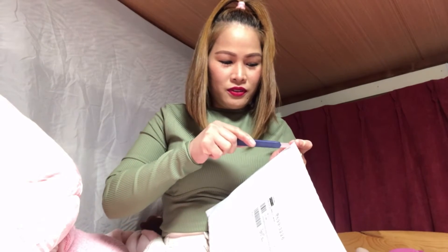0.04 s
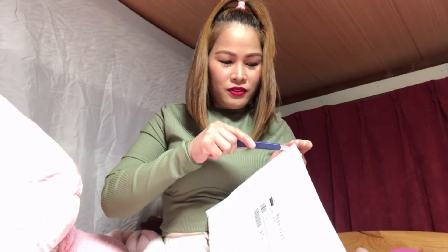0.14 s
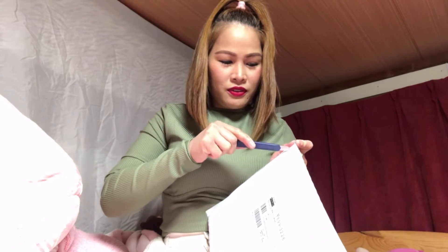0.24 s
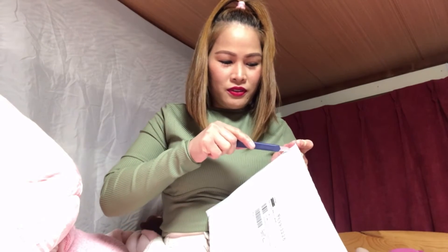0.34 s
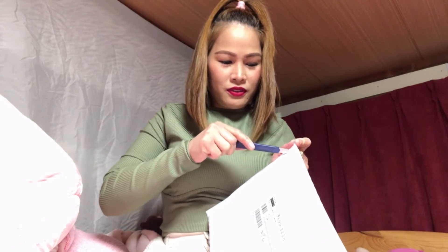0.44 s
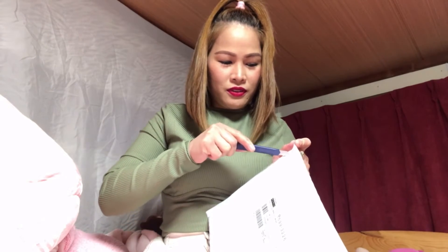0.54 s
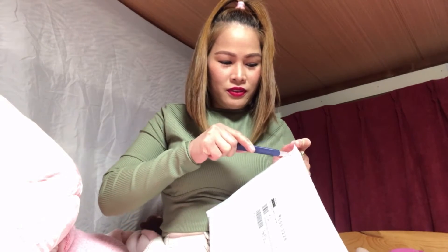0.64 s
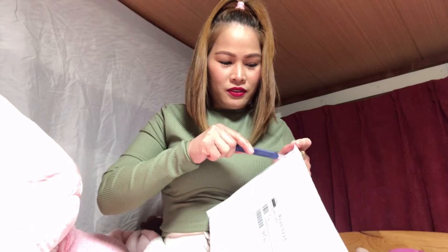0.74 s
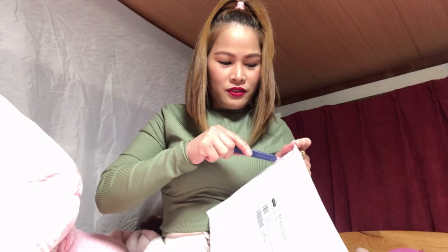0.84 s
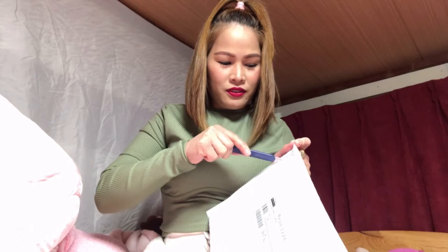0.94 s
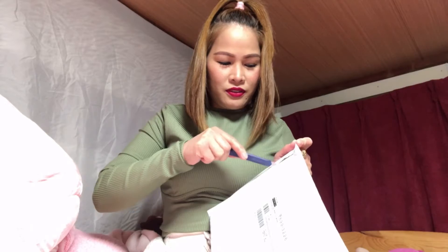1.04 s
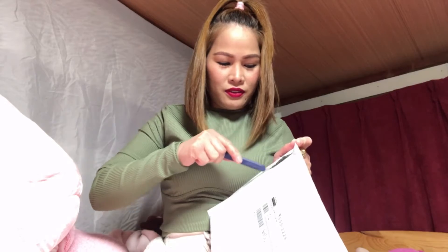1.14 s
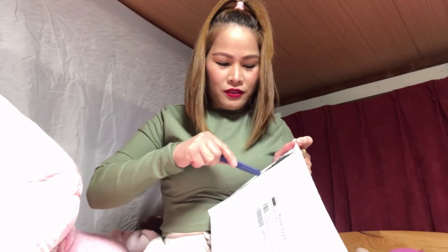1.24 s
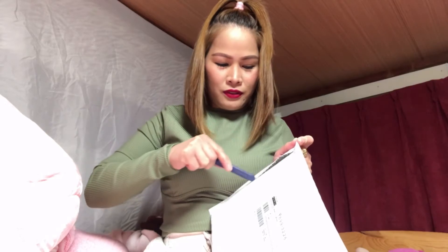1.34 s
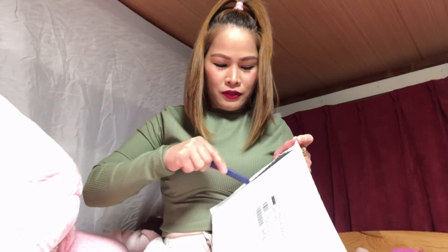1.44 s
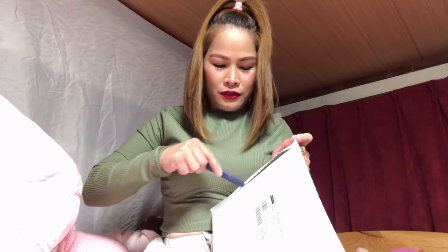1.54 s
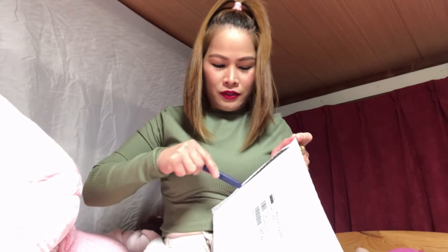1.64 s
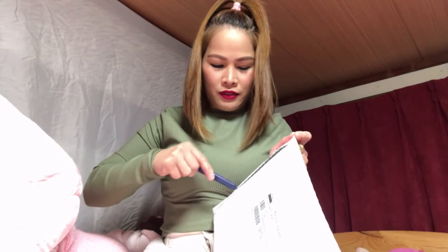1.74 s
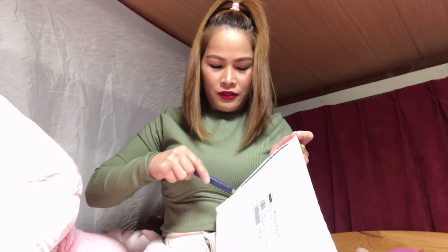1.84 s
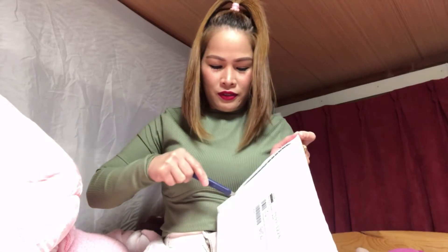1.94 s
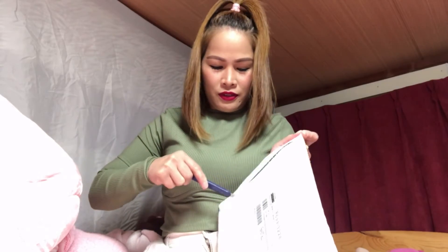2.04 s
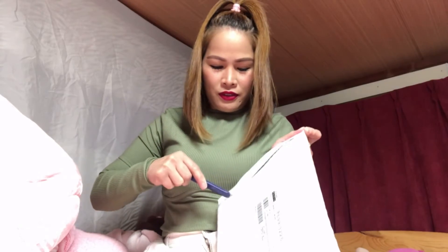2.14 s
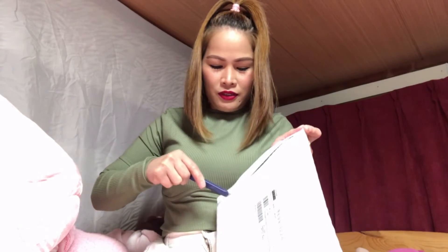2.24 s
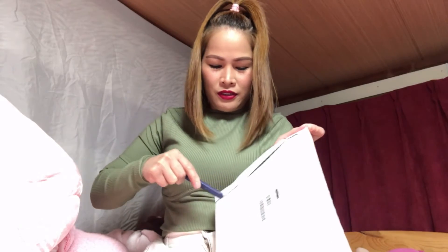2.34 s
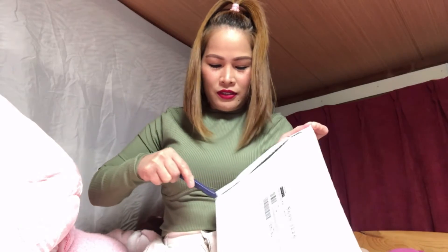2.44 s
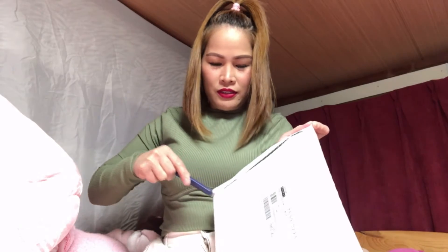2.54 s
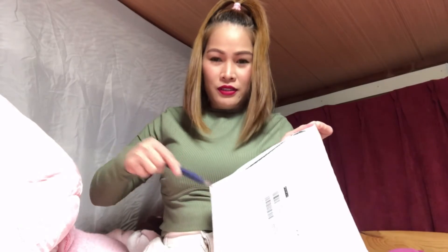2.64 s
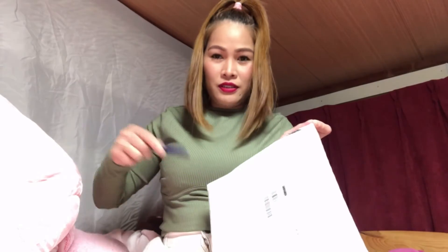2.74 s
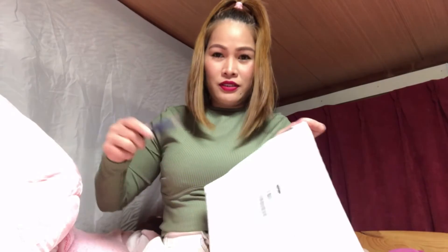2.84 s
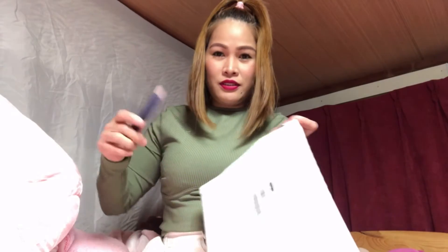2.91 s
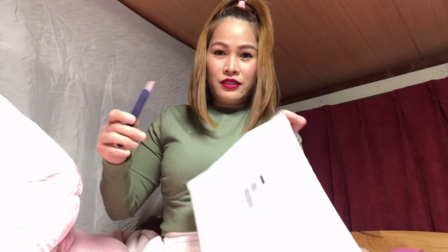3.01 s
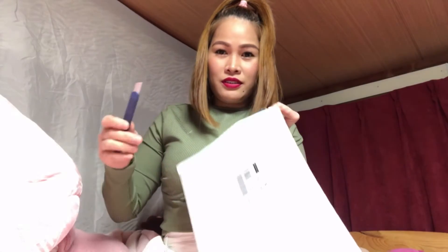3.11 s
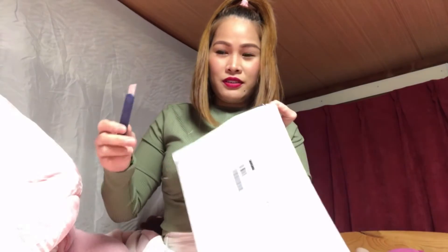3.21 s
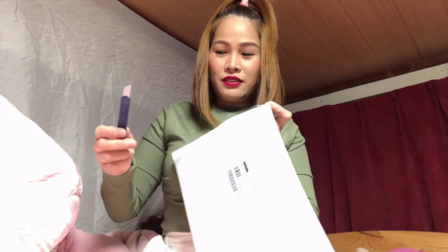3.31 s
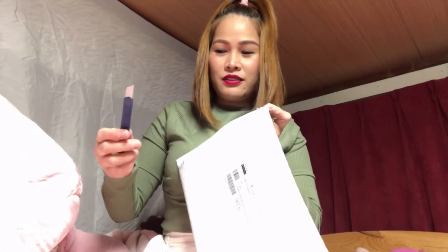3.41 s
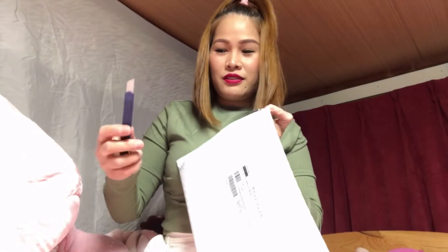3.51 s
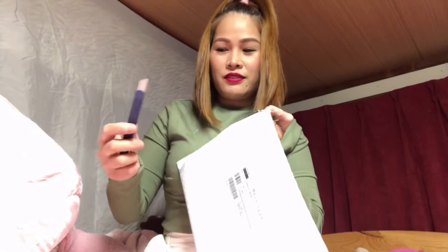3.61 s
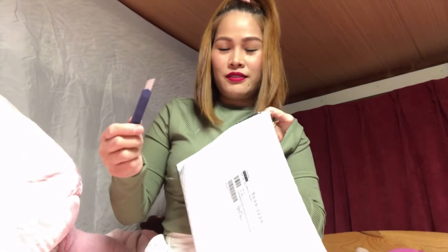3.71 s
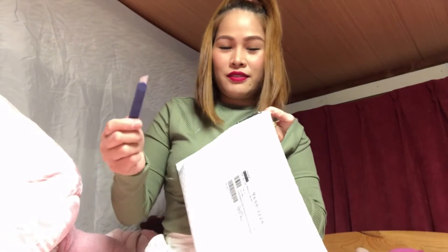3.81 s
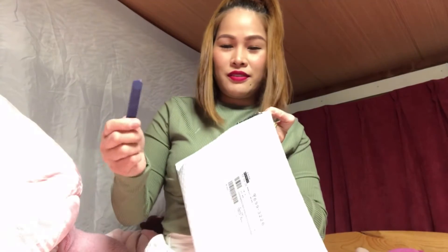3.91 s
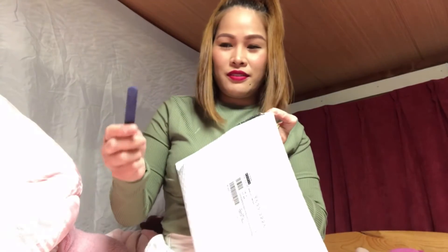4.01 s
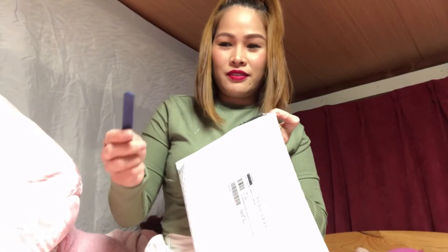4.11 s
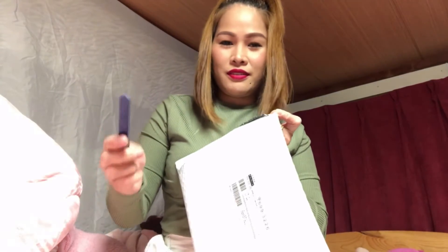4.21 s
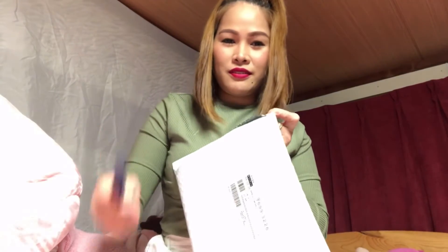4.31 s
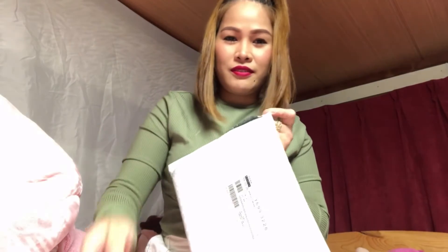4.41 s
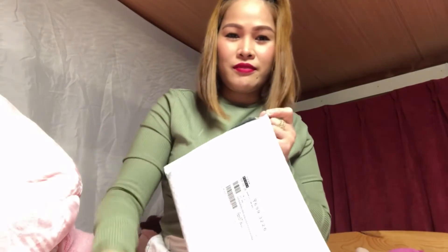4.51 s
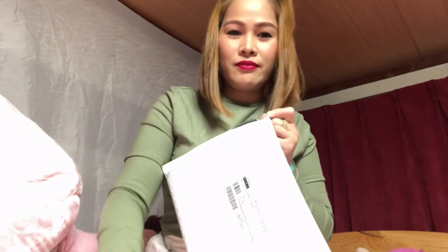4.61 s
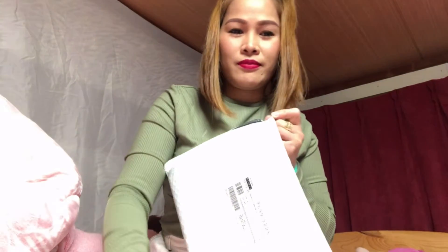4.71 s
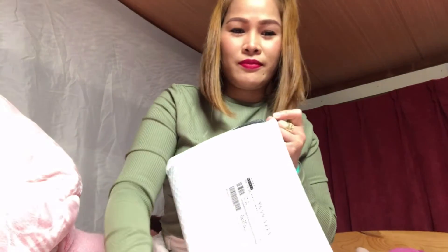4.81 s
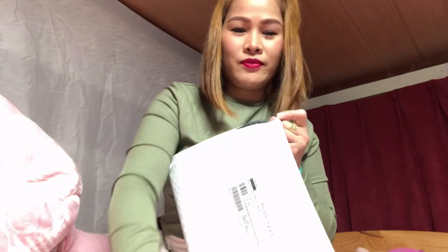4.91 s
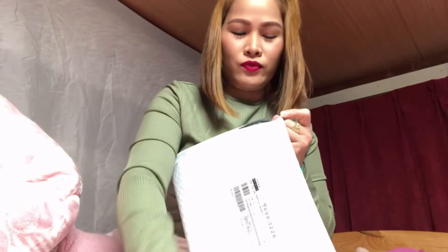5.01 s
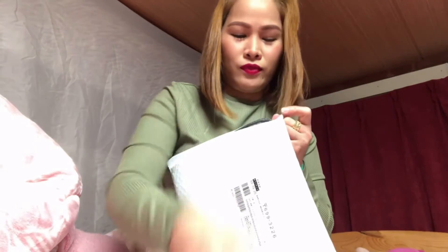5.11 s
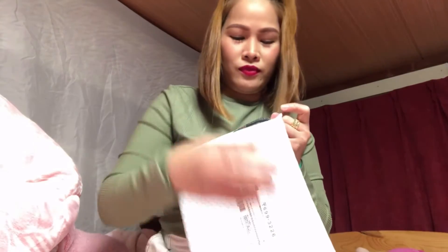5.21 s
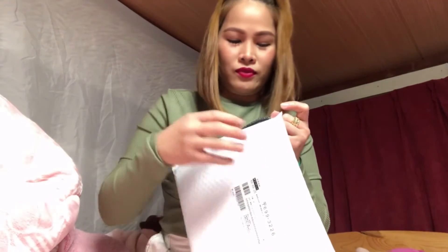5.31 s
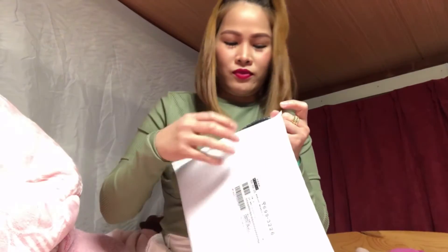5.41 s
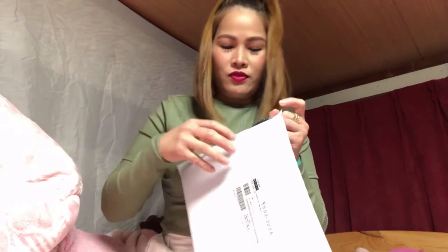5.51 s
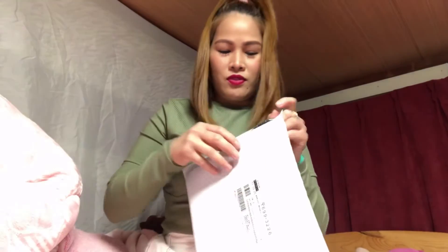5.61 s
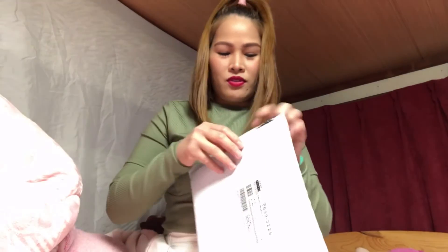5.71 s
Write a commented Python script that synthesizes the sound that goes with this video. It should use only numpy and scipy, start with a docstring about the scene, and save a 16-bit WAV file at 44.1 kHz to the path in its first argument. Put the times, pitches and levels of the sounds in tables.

```python
"""A small quiet room, close up: a stiff paper envelope is slit open with a snap-off knife.
The blade sticks and breaks through the edge in dry snaps, then chatters out at the far corner.
Paper rubs against a sleeve, the blade ratchets back notch by notch into its plastic handle,
and shifting fingers pop the envelope. Faint air and a low hum lie underneath."""
import sys
import numpy as np
from scipy import signal
from scipy.fft import rfft, irfft
from scipy.io import wavfile
from scipy.ndimage import map_coordinates

SR = 44100
rng = np.random.default_rng(int(sys.argv[2]) if len(sys.argv) > 2 else 0)


def unload_audio(sound):
    """Save the sound as a 16-bit wav file, at the path given as the first command line argument."""
    columns = np.transpose(np.atleast_2d(sound))
    # keep every value between -1 and 1, then stretch to whole-number steps
    steps = np.round(np.clip(columns, -1, 1) * 32767)
    wavfile.write(sys.argv[1], SR, steps.astype(np.int16))


N = 253575
TIME = np.arange(N) / SR

# tone of breaking paper: (frequency [Hz], gain [dB])
PAPER_EQ = [(80, -42.5), (160, -13), (250, -10.5), (480, -7), (800, -4), (1200, -2.5), (2100, -2.5),
            (3300, -3), (4200, -8), (6300, -10), (9000, -18), (15500, -21.5)]


def blade_snaps(size=2048):
    """The blade sticks and breaks through; its place along the fold colours each snap."""
    # main breaks: (time [s], level [dB], break length [ms])
    breaks = [(0.0776, -42, 0.35), (0.1418, -32.5, 1.7), (0.157, -45.5, 1), (0.197, -54, 0.55),
              (0.2879, -44, 0.13), (0.297, -37.5, 0.14), (0.3124, -44, 0.71), (0.4183, -30.5, 1.4),
              (0.5456, -43.5, 0.45), (0.5904, -40.5, 0.36), (0.6081, -53, 0.13), (0.739, -43.5, 0.96),
              (0.745, -37.5, 1.5), (0.7596, -28.5, 2.2), (0.7954, -40, 0.53), (0.814, -33.5, 3.2),
              (0.8388, -31, 2.2), (0.966, -39.5, 0.82), (0.9823, -28, 0.81), (0.9954, -34, 0.23),
              (1.018, -36, .2), (1.0568, -30, 0.44), (1.076, -34, 2.8), (1.1348, -31, 2.2),
              (1.151, -37, 0.48), (1.19, -35.5, 0.84), (1.223, -30, 0.76), (1.2452, -35, 0.21),
              (1.2695, -40.5, 0.55), (1.3121, -30.5, 1.6), (1.3256, -27.5, 0.43), (1.372, -34, 4),
              (1.3797, -32, 0.62), (1.4246, -35.5, 0.64), (1.4372, -33.5, 4.3), (1.4929, -35.5, 1.1),
              (1.5115, -35, 4.6), (1.574, -31.5, 1.5), (1.5985, -42.5, .5), (1.6054, -35.5, 1.2),
              (1.6587, -34, 4.8), (1.6883, -35.5, 0.75), (1.714, -29.5, 0.19), (1.785, -38.5, 1.7),
              (1.7919, -36, 0.68), (1.8322, -26.5, 0.77), (1.853, -31.5, 0.31), (1.8873, -34.5, .45),
              (1.9112, -32, 2.4), (1.9394, -35.5, 2.4), (2.0037, -38.5, 1.5), (2.021, -24, 0.27),
              (2.039, -32, 4.3), (2.0734, -32, 0.22), (2.085, -41, 0.44), (2.1015, -23.5, 1.56),
              (2.1387, -25, 0.54), (2.1639, -34.5, 2), (2.233, -25.5, 0.75), (2.2598, -31, 0.77),
              (2.2738, -31, 0.31), (2.2785, -34, 1.5), (2.316, -30.5, 0.57), (2.326, -30.5, 0.41),
              (2.3624, -31, 0.72), (2.373, -29.5, 1.1), (2.4238, -42, 3.4), (2.4542, -48.5, 1.8)]
    # tone of the sheet along the cut: (time [s], low shelf [dB], high shelf [dB])
    cut_tone = [(0.08, -9.5, 8), (0.42, 1.5, 5), (0.6, -3.5, 9), (0.77, -3.5, 2), (1.0, 4.5, 14),
                (1.42, -1.5, -8.5), (1.85, 0.5, -3.5), (2.1, -5.5, -10), (2.3, -1, -5.5)]
    # two notes of the taut panel, sagging as the slit frees it:
    # (time [s], lower note [Hz], its boost [dB], upper note [Hz], its boost [dB])
    panel_notes = [(0.3, 1490, 4, 3850, 9), (0.76, 950, -2, 3400, 3.5), (1.0, 1790, 3, 3660, 3.5),
                   (1.25, 1670, 9, 3160, 2), (1.44, 1690, 9, 3200, -3), (1.6, 1240, 9.5, 2940, 0),
                   (1.85, 1300, 7, 2730, 4.5), (2.12, 1210, 6, 3150, 3.5), (2.26, 1220, 4, 2940, 9)]
    out, hz, followers = np.zeros(N), bins(size), []
    # each break may set off up to two weak ones just behind it
    for (s, db, _), draws in zip(breaks, rng.random((len(breaks), 2, 3))):
        for chance, wait, strength in draws:
            if chance < .42:
                weak_db = -47.5 + 0.61 * (db + 34.5) + 3.5 * (2 * strength - 1)
                followers.append((s + np.interp(wait, [0, 1], [0.0042, 0.033]), weak_db, .6))
    for s, db, length_ms in breaks + followers:
        body_db, edge_db = at_time(cut_tone, s)
        body_db += 1.1 * np.log2(length_ms)  # a longer break moves more of the sheet
        body_db += 2.5 * rng.standard_normal()
        edge_db += 3.5 * rng.standard_normal()
        lower_hz, lower_db, upper_hz, upper_db = at_time(panel_notes, s)
        panel_db = lower_db * bump(hz, lower_hz, q=2.7) + upper_db * bump(hz, upper_hz, q=2.7)
        add(out, s, paper_snap(s, db, body_db, edge_db, length_ms, panel_db))
    return out


def paper_snap(s, db, body_db, edge_db, length_ms, panel_db, size=2048):
    """A fibre bundle breaks, its neighbours follow, and bending waves run on through the sheet."""
    # the top octave beams, brightest while the open edge faces the listener: (time [s], high shelf [dB])
    facing = [(0.85, -9.5), (1.5, 7), (2.4, 8.5), (5.1, -14.5)]
    t, hz = np.arange(size) / SR, bins(size)
    length_s = max(length_ms, .2) / 1000
    fibres = unit(rng.standard_normal(size) ** 3 * np.exp(-t / length_s)) * length_s / 0.00039
    fibres[0] += 1  # the first break
    swell = 1 - np.exp(-t / .0007)
    low_waves = filtered(rng.standard_normal(size), 1 - above(hz, 1300)) * swell * np.exp(-t / .0045)
    high_waves = filtered(rng.standard_normal(size), above(hz, 1300)) * swell * np.exp(-t / .003)
    sheet = gain_of(-14) * unit(low_waves) + gain_of(-10) * unit(high_waves)
    shelves_db = body_db * (1 - above(hz, 1570)) + edge_db * above(hz, 6400)
    beam_db = np.interp(s, *np.transpose(facing)) * above(hz, 8600)
    sound = coloured(unit(fibres) + sheet, read(PAPER_EQ, hz) + shelves_db + beam_db + panel_db)
    # the treble arrives first, 1 kHz half a millisecond later
    dispersion = np.exp(-4j * np.pi * .0005 * np.sqrt(1000 * hz))
    return at_level(filtered(sound, dispersion), db)


def corner_chatter(size=2048):
    """Quick slips of the blade ring the last taut corner."""
    # blade slips: (time [s], level [dB])
    slips = [(2.6151, -42.5), (2.628, -43.5), (2.635, -33.5), (2.6444, -33), (2.6521, -39.5)]
    # ring of the corner: (frequency [Hz], relative level [dB], t60 [s])
    corner_modes = [(1245, 0, 0.015), (1500, -0.5, 0.028), (1750, -8, 0.026), (3280, -21, 0.013),
                    (4460, -13.5, 0.021)]
    out, t, hz = np.zeros(N), np.arange(size) / SR, bins(size)
    for s, db in slips:
        burst = rng.standard_normal(size) * np.exp(-t / 0.0054)
        rasp = coloured(burst, read(PAPER_EQ, hz) - 5 * above(hz, 6600))
        corner = ring(corner_modes, t, detune=0.023)
        add(out, s, at_level(unit(corner) + gain_of(-6.5) * unit(rasp), db))
    return out


def knife_ratchet(size=4096):
    """The spring slips off a tooth, slams into the next notch, and the loose blade rattles."""
    # the slider jumps from notch to notch and locks: (time [s], level [dB], high shelf [dB])
    notches = [(3.6535, -46.5, 4), (3.672, -52, 2), (3.7052, -44, -17.5), (3.733, -48, -13),
               (3.786, -52, -12), (3.8019, -20.5, 9.5), (3.8195, -24, 6), (3.8398, -22, 10),
               (3.868, -20.5, 10), (3.8958, -21, 7), (3.9146, -22.5, 11), (3.9363, -22, 8.5),
               (3.958, -22.5, 9), (3.9746, -25, 8.5), (3.993, -38.5, -7), (4.208, -29.5, 8.5)]
    # tone of a notch click: (frequency [Hz], gain [dB])
    click_eq = [(200, -16), (480, -24), (870, -8.5), (1700, -8.5), (2700, -4), (3900, -4.5), (5000, -8.5),
                (5700, -3), (8200, -10.5), (9000, -11.5), (11300, -10), (15800, -17)]
    # ring of slider and blade: (frequency [Hz], relative level [dB], t60 [s])
    knife_modes = [(4100, 6.5, 0.03), (4960, 4, 0.043), (5350, 5, 0.057), (5660, 0, 0.015),
                   (6300, -15, 0.015), (7300, 4.5, .025), (7880, 3, 0.02), (10000, 5, .018),
                   (11000, -14.5, .02), (11600, -2, 0.044), (14260, -5, 0.052)]
    # the handle's note falls as the blade slides in and rings out at the lock:
    # (time [s], note [Hz], boost [dB])
    handle_note = [(3.7, 3330, 1), (3.8, 2760, 6), (3.98, 2410, 6), (4.2, 3280, 10.5)]
    out, t, hz = np.zeros(N), np.arange(size) / SR, bins(size)
    for s, db, edge_db in notches:
        note_hz, note_db = at_time(handle_note, s)
        since_slam = np.maximum(t - .0013 - .0005 * rng.random(), 0)
        slip = rng.standard_normal(size) * np.exp(-t / .0018) * np.minimum(t / .0003, 1)
        slam = rng.standard_normal(size) * (since_slam > 0) * np.exp(-since_slam / .0013)
        rattle = rng.standard_normal(size) * (since_slam > 0) * np.exp(-since_slam / 0.0046)
        impact = slam + gain_of(-6.5) * filtered(slip, 1 - 0.34 * above(hz, 7000))  # dull plastic
        impact += gain_of(-3.5) * filtered(rattle, above(hz, 2600))  # bright steel
        ringing = ring(knife_modes, since_slam, detune=0.0036)
        ringing += ring([(note_hz, 7, .011)], t, detune=0.0207)
        click = unit(coloured(impact, read(click_eq, hz))) + gain_of(-8) * unit(ringing)
        tone_db = edge_db * above(hz, 5000) + note_db * bump(hz, note_hz, q=7)
        add(out, s, at_level(coloured(click, tone_db), db))
    return out


def envelope_knocks(size=2048):
    """The knife bumps the envelope during the cut; later, shifting fingers tick and pop the sheet."""
    # knocks: (time [s], level [dB], low shelf [dB], high shelf [dB], contact [ms], panel note [Hz])
    knocks = [(1.2048, -37.5, 1, -12, 1.9, 570), (1.2825, -36.5, 7.5, -2, 3.1, 600),
              (2.838, -47, -35, -24, 1, 2640), (3.1575, -42.5, 9, -3, 0.45, 2940),
              (3.1865, -51.5, -8, 15, 0.73, 7500), (3.3982, -57, 0, 2, 1.8, 3200),
              (4.31, -52.5, -17, 17, 1.5, 4870), (4.4444, -39, 1, 15.5, 1.4, 3720),
              (4.7076, -33.5, 12, 1, 0.59, 480), (4.747, -47, -16, -2, 0.76, 2350),
              (5.0965, -45, 12, 3, 1.9, 1260), (5.106, -40.5, 7.5, 25, 1.3, 530),
              (5.1317, -43, 18, -11, 3.7, 636), (5.1533, -42, 8, 16, 6.9, 560),
              (5.484, -50.5, 1, 7, 0.54, 2660)]
    out = np.zeros(N)
    for s, db, body_db, edge_db, length_ms, note_hz in knocks:
        panel_db = 10 * bump(bins(size), note_hz, q=2.8)
        add(out, s, paper_snap(s, db, body_db, edge_db, length_ms, panel_db))
    return out


def blade_drag():
    """Between snaps the blade parts single fibres in a fine fizz."""
    # drag along the fold: (time [s], relative level [dB])
    fader = [(0.0, -71.5), (0.93, -72), (1.0, -65.5), (1.2, -47), (1.55, -63), (2.1, -53), (2.2, -61.5),
             (2.35, -47.5), (2.5, -67)]
    level = gain_of(np.interp(TIME, *np.transpose(fader), right=-120) - 2.5)
    breaks = grains(per_s=1600, spread_db=4.0)
    burst = rng.standard_normal(256) * np.exp(-np.arange(256) / 45)
    fibres = signal.fftconvolve(breaks, burst)[:N]
    fizz = filtered(fibres, gain_of(read(PAPER_EQ, bins(N)) - 1.5 * above(bins(N), 4500)))
    return level * evened(fizz)


def paper_slide():
    """Paper rubs over cloth: dense slips and a few ticks, coloured by the hollow of the envelope."""
    # tone of the rub: (frequency [Hz], gain [dB])
    rub_eq = [(200, -7), (400, -2), (750, -1), (1000, -3), (1400, -1.5), (2100, -7), (3200, -7.5),
              (4000, -12.5), (5100, -11), (7900, -14.5), (9500, -22), (13000, -27), (15500, -33)]
    # hollow resonances, shifting as the envelope turns: (time [s], lower [Hz], upper [Hz], strength [dB])
    hollow_notes = [(2.45, 3250, 4460, -12), (2.75, 3500, 4650, 16.5), (3.0, 3250, 5110, -10),
                    (3.28, 3100, 5300, 2), (3.5, 3200, 5700, -12), (4.3, 3080, 4860, -5),
                    (5.75, 2960, 5370, -24)]
    hz = bins(N)
    slips = grains(per_s=6000, spread_db=-4.0) + gain_of(-15.5) * grains(per_s=20, spread_db=4.5)
    rub = filtered(slips, gain_of(read(rub_eq, hz))) * gain_of(1.3 * wander(38))
    lower_hz, upper_hz, strength_db = at_time(hollow_notes, TIME)
    rustle = filtered(rub, above(hz, 1500) * (1 - above(hz, 6750)))
    hollow = resonate(rustle, lower_hz, width_hz=280) + 1.2 * resonate(rustle, upper_hz, width_hz=380)
    rustle += gain_of(strength_db) * hollow
    rustle /= np.sqrt(1 + gain_of(strength_db))  # tames the level as the hollow rings
    flutter = filtered(rub, above(hz, 360) * (1 - above(hz, 1080)))
    hiss = filtered(rub, above(hz, 11000))
    return sum(evened(layer) * gain for layer, gain in zip((rustle, flutter, hiss), stroke_gains()))


def stroke_gains(attack_s=0.062, release_s=0.048):
    """Each stroke swells, holds and fades over the faint sound of the held paper; one gain a layer."""
    # strokes over cloth and skin: (start [s], length [s], rustle [dB], flutter [dB], hiss [dB])
    strokes = [(2.401, 0.37, -61.5, -66.5, -68), (2.786, 0.29, -58, -65, -67.5),
               (3.12, 0.19, -58.5, -59.5, -65.5), (3.362, 0.031, -51.5, -54.5, -66),
               (3.59, 0.14, -65, -72, -85), (4.25, 0.65, -62, -72, -71.5), (4.707, 0.28, -62.5, -65.5, -74),
               (5.032, .12, -55.5, -61, -67.5), (5.422, 0.26, -61.5, -66.5, -79),
               (5.706, .1, -48.5, -52, -58)]
    # bed of the held envelope, from the first stroke on: (rustle [dB], flutter [dB], hiss [dB])
    held_db = (-68, -76, -80.5)
    power = np.outer(gain_of(held_db), TIME > strokes[0][0]) ** 2
    for start, length, *levels_db in strokes:
        attack = np.clip((TIME - start) / attack_s, 0, 1)
        release = np.clip(1 - (TIME - start - length) / release_s, 0, 1)
        power += np.outer(gain_of(levels_db), attack * release) ** 2
    return np.sqrt(power)


def near_echo(x):
    """The envelope's face and the body behind it reflect each click; the gap drifts as the hands move."""
    delay_s = 0.0034 + 0.00026 * wander(4.7)
    echo = map_coordinates(x, [np.arange(N) - delay_s * SR], order=3)
    return gain_of(-11.5) * filtered(echo, above(bins(N), 710))


def room_reverb(x, size=22050):
    """Short, softly furnished room: scattered reflections whose treble dies first."""
    # decay of the room: (frequency [Hz], t60 [s])
    decay_times = [(150, 0.32), (700, 0.26), (2500, 0.2), (6000, 0.18), (15000, 0.09)]
    # tone of the tail: (frequency [Hz], gain [dB])
    tail_eq = [(200, 0), (700, -5.5), (1500, -10.5), (3000, -10), (6000, -9), (15000, -3.5)]
    reflections = rng.standard_normal(size) * (rng.random(size) < 3000 / SR)
    hz, frame_s, spectra = signal.stft(reflections, SR, nperseg=256)
    spectra = spectra * gain_of(-60 * frame_s / read(decay_times, hz)[:, None])
    tail = signal.istft(spectra, SR, nperseg=256)[1][:size]
    tail *= np.interp(np.arange(size) / SR, [.003, .007, .017, .021], [0, 0.99, 0.6, 0.54])  # onset
    tail = coloured(unit(tail), read(tail_eq, bins(size)))
    return signal.fftconvolve(x, tail)[:N]


def room_tone(air_db=-60.5):
    """Faint air noise and a wavering low hum."""
    # tone of the still air: (frequency [Hz], gain [dB])
    air_eq = [(25, -32), (60, 1), (110, 8), (170, 1.5), (250, -1), (400, -1.5), (700, -9.5), (1200, -18.5),
              (2500, -22.5), (8000, -25.5), (15000, -35.5)]
    # hum partials: (frequency [Hz], level [dB], unsteadiness [0-1])
    partials = [(40.7, -63.5, 0), (81, -68, 0.5), (101.4, -65, 0.26), (118.3, -62.5, 0.57)]
    out = gain_of(air_db) * evened(filtered(rng.standard_normal(N), gain_of(read(air_eq, bins(N)))))
    for hz, db, unsteady in partials:
        phase = 2 * np.pi * (hz * TIME + rng.random()) + unsteady * 2 * wander(1.75)
        waver = 1 + .5 * unsteady * wander(6.1)
        out += gain_of(db) * np.sqrt(2) * np.cos(phase) * waver
    return out


def ring(modes, t, detune):
    """Damped modes, struck a little differently every time."""
    out = np.zeros(len(t))
    for hz, db, t60 in modes:
        strike = (.5 + rng.random()) * rng.choice([-1, 1])
        struck_hz = hz * (1 + detune * rng.standard_normal())
        out += strike * gain_of(db - 60 * t / t60) * np.sin(2 * np.pi * struck_hz * t)
    return out


def grains(per_s, spread_db):
    """Tiny fibre slips of random size at random moments."""
    sizes = gain_of(spread_db * np.minimum(rng.exponential(1, N), 4))
    return evened(sizes * rng.standard_normal(N) * (rng.random(N) < per_s / SR))


def wander(rate_hz):
    """Smooth random drift with an rms of 1."""
    return evened(filtered(rng.standard_normal(N), np.exp(-(bins(N) / rate_hz) ** 2)))


def resonate(x, hz, width_hz):
    """A resonance of gain 1 that follows the curve hz."""
    carrier = np.exp(2j * np.pi * np.cumsum(hz) / SR)
    pole = np.exp(-np.pi * width_hz / SR)
    return 2 * (carrier * signal.lfilter([1 - pole], [1, -pole], x / carrier)).real


def coloured(x, db):
    """Minimum-phase EQ: nothing sounds ahead of a click."""
    log_gain = np.log(gain_of(np.maximum(db, db.max() - 70)))
    mirrored = np.concatenate([log_gain, log_gain[-2:0:-1]])
    return filtered(x, np.exp(np.conj(signal.hilbert(mirrored)))[:len(db)])


def filtered(x, gain):
    """Applies one gain to each frequency bin."""
    return irfft(rfft(x) * gain, len(x))


def above(hz, corner_hz):
    """Smooth step from 0 to 1 around a corner."""
    return hz ** 4 / (hz ** 4 + corner_hz ** 4)


def bump(hz, centre_hz, q):
    """Shape of a resonance, 1 at its centre."""
    return 1 / (1 + (2 * q * (hz / centre_hz - 1)) ** 2)


def bins(size):
    """Bin frequencies for a sound of this many samples."""
    return np.fft.rfftfreq(size, 1 / SR)


def read(points, hz):
    """Joins (Hz, value) points on a log-frequency axis."""
    point_hz, value = np.transpose(points)
    return np.interp(np.log(hz + 1), np.log(point_hz + 1), value)


def at_time(curve, s):
    """Values of a curve's columns at time s."""
    when, *columns = np.transpose(curve)
    return [np.interp(s, when, column) for column in columns]


def gain_of(db):
    """Decibels to amplitude."""
    return 10 ** (np.asarray(db) / 20)


def at_level(x, db, size=220):
    """Scales a click so that its first five milliseconds have this rms level."""
    return gain_of(db) * x / np.sqrt(np.mean(x[:size] ** 2))


def evened(x):
    """Scales to an rms of 1."""
    return x / np.sqrt(np.mean(x ** 2) + 1e-20)


def unit(x):
    """Scales to an energy of 1."""
    return x / np.linalg.norm(x)


def add(mix, s, sound):
    """Mixes a sound in at time s."""
    part = mix[max(round(s * SR), 0):][:len(sound)]
    part += sound[:len(part)]


def scene():
    """Sharp clicks with their echoes, over friction and room tone, in mono."""
    clicks = blade_snaps() + envelope_knocks() + corner_chatter() + knife_ratchet()
    echoes = near_echo(clicks) + gain_of(-8.0) * room_reverb(clicks)
    return (clicks + echoes + blade_drag() + paper_slide() + room_tone())[None]


def record(dry):
    """A steep low-pass at 15.9 kHz trims the very top."""
    low_pass = signal.firwin(511, 15900, window=("kaiser", 9), fs=SR)
    return signal.oaconvolve(dry, low_pass[None], "same")


dry = scene()
out = record(dry)
unload_audio(out)
```